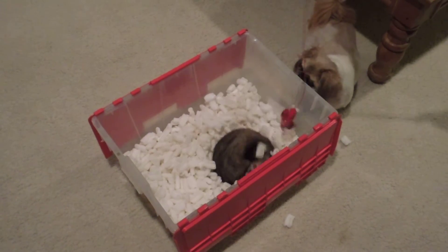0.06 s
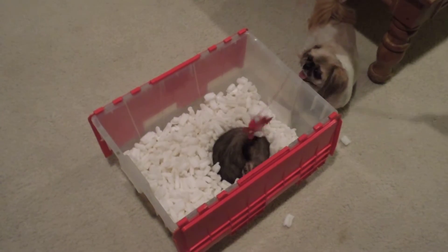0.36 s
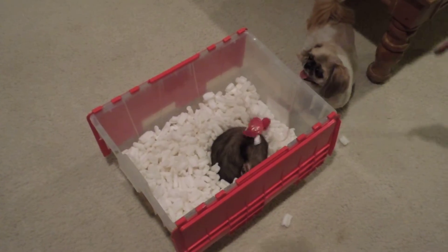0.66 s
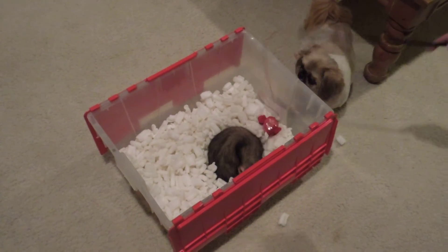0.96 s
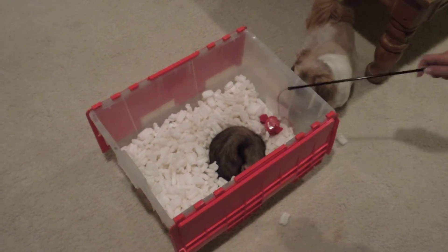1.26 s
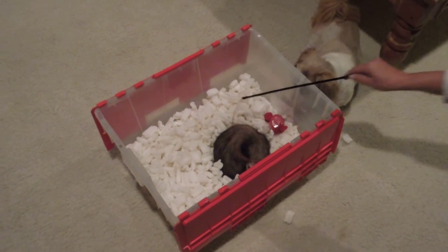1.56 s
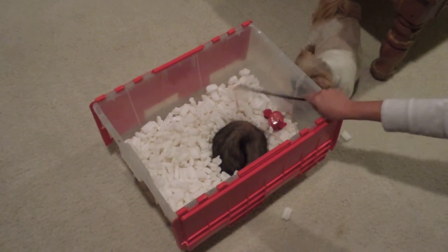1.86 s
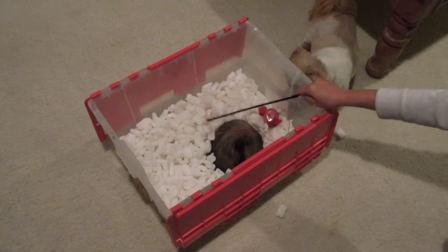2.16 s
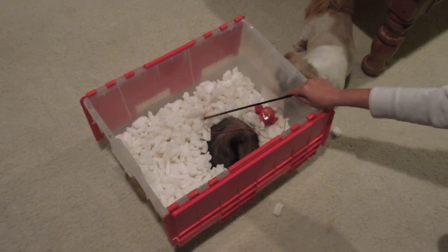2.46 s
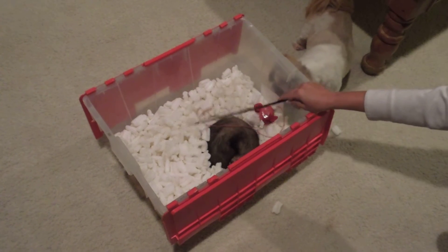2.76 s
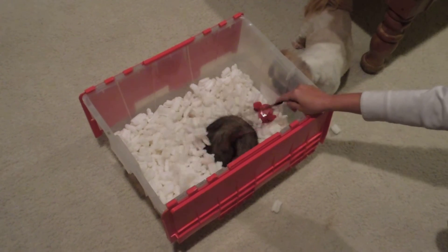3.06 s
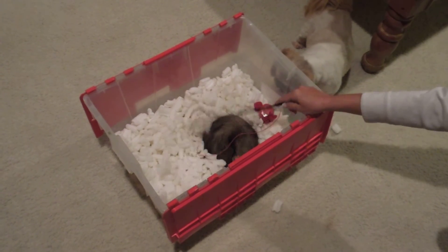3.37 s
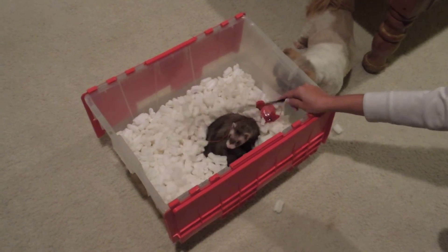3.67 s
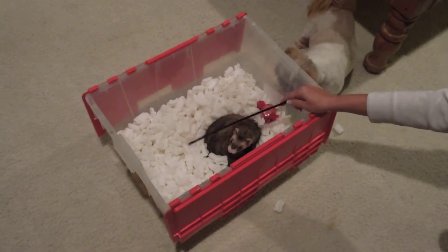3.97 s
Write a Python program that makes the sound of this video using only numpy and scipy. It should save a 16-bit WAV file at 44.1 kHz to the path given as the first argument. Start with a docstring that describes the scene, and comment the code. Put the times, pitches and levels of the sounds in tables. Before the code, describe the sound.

Scratchy rustling of packing foam, churned by a ferret and a stick in a bin.

```python
"""Foam packing pieces settle with a soft crackle as a ferret and a stick stir them in a plastic bin.
The foam rustles twice, then is churned about ten times a second. Every shove is a swarm of tiny slips:
a bright crackle on top, a hollow rumble from the bin below. Single pieces snap, stick and paws knock,
and friction adds light scrapes and one thin squeal. Behind it all is a quiet carpeted room, humming faintly."""
import sys
import numpy as np
from scipy import signal
from scipy.fft import rfft, irfft
from scipy.io import wavfile

SR = 44100
rng = np.random.default_rng(int(sys.argv[2]) if len(sys.argv) > 2 else 0)


def transcribe(u):
    """Save the signal u as a 16-bit wav file named by the first command-line argument.

    u: samples, shape (n,) or (channels, n), limited to [-1, 1]; the rate is SR.
    q: integer samples, one column per channel.
    """
    v = np.clip(np.atleast_2d(u).T, -1, 1)
    q = np.round(v * 32767).astype(np.int16)
    wavfile.write(sys.argv[1], SR, q)


N = 176400
TOP_HZ = 14100
SNAP_S = 0.0012  # decay of snaps and ticks
GRIPS_PER_S = 500  # stick-slip rate of scrapes and squeal
CRACKLE, RUMBLE = 0, 1  # which level column drives a layer


def stirred_bin(crackle_gain, rumble_gain, room_db=-8.5, room_t60_s=0.4):
    """Everything that sounds in the bin, with the room's short tail."""
    close = crackle(crackle_gain) + rumble(rumble_gain) + knocks() + scrapes() + squeal()
    room = burst(room_t60_s / np.log(1000), size=22050)
    return close + undb(room_db) * convolve(close, room)


def shoving(layer, release_s, attack_s=0.0041):
    """Envelope of the shoves: each rises, holds and dies away, and overlaps add in power."""
    # shoves through the foam: start_s, hold_s, crackle_db, rumble_db
    shoves = [ (0.731, 0.016, -35, -62), (.806, 0.04, -35.5, -51), (1.019, 0.025, -45, -60),
              (1.264, 0.004, -45.5, -50), (1.928, 0.006, -28.5, -44), (1.967, 0.076, -27.5, -37.5),
              (2.093, 0.02, -34, -57), (2.127, 0.0091, -27.5, -35.5), (2.16, 0.01, -35.5, -44),
              (2.2, 0.016, -29.5, -37), (2.237, 0.01, -29, -36.5), (2.315, 0.019, -32.5, -42.5),
              (2.379, 0.0099, -33.5, -41), (2.469, 0.013, -32, -49), (2.527, 0.032, -33, -42),
              (2.632, 0.086, -39, -49), (2.775, 0.0056, -34, -55), (2.876, 0.024, -33, -45.5),
              (2.921, 0.016, -37.5, -59), (2.984, 0.037, -34, -41), (3.08, 0.01, -24, -34.5),
              (3.188, 0.022, -28.5, -37.5), (3.279, 0.014, -28, -36.5), (3.4, 0.012, -28.5, -36.5),
              (3.474, 0.041, -30.5, -58), (3.575, 0.05, -28.5, -43), (3.667, 0.021, -32, -41.5),
              (3.693, 0.019, -28.5, -38), (3.778, 0.022, -30.5, -39), (3.846, 0.012, -35, -41)]
    t, power = np.arange(N) / SR, 0
    for start, hold, *db in shoves:
        rise = np.maximum(start - t, 0) / attack_s
        fall = np.maximum(t - start - hold, 0) / release_s
        power = power + (undb(db[layer]) * np.exp(-rise - fall)) ** 2
    return np.sqrt(power)


def shifting(layer):
    """Envelope of the foam that keeps shifting round the animal."""
    # level curve: time_s, crackle_db, rumble_db
    curve = [(0, -35, -37), (.06, -37, -41), (.31, -43, -50), (.45, -53, -60.5), (.6, -63.5, -62),
             (0.881, -52.5, -55.5), (.96, -52, -60), (1.14, -55, -53.5), (1.3, -50.5, -54),
             (1.5, -67, -57.5), (1.84, -58, -61.5), (1.96, -47, -43.5), (2.3, -45, -47.5),
             (2.85, -47.5, -53.5), (3.15, -38, -43.5), (3.4, -51.5, -48), (3.62, -44, -39.5),
             (3.85, -42.5, -68), (4, -48.5, -53)]
    times, *levels = np.array(curve).T
    return undb(np.interp(np.arange(N) / SR, times, levels[layer]))


def crackle(shove_gain, wall_s=0.0042, wall_db=-4.5):
    """Bright shoves on top, duller shifting deep in the heap, single snaps; the bin's walls smear them."""
    # duller tone of buried foam: freq_hz, gain_db
    buried_eq = [(2500, 7), (11000, -2.5)]
    # single pieces snapping: start_s, level_db
    snaps = [(0.709, -36.5), (0.716, -35), (0.879, -38), (1.2546, -31.5), (1.886, -38), (1.911, -38),
             (1.922, -26), (1.9339, -22), (1.998, -22), (2.046, -18.5), (2.3855, -28.5), (2.63, -31),
             (2.997, -25), (3.2816, -24), (3.386, -32), (3.5545, -30), (3.7805, -27)]
    # bright tone of the whole crackle: freq_hz, relative_db
    crackle_eq = [(200, -44.5), (700, -17.5), (1500, -12.5), (3800, -7.5), (5600, -7.5), (8000, -4.5),
                  (10500, -0.5), (12200, 1.5), (14000, -2)]
    foam = rubbing() * shove_gain + shade(rubbing() * shifting(CRACKLE), buried_eq)
    for start, db in snaps:
        snap = burst(SNAP_S) * undb(db) * np.sqrt(2 * SNAP_S * SR)
        i = int(start * SR)
        foam[i:i + len(snap)] += snap[:N - i]
    return colour(foam + undb(wall_db) * scatter(foam, wall_s), crackle_eq)


def rubbing(squeak_db=-6, tick_db=-5.5):
    """Foam slipping against foam: a swarm of tiny clicks and squeaks, with sparser crisp ticks."""
    slips = unit(scatter(clicks(per_s=3200), decay_s=0.0003))
    ticks = unit(scatter(clicks(per_s=130, spread_db=2.8), SNAP_S))
    return unit(slips + undb(squeak_db) * squeaks() + undb(tick_db) * ticks)


def squeaks(pieces=300, low_hz=900, decay_s=0.0025):
    """Pieces of different sizes each ring briefly at their own pitch when rubbed."""
    t = np.arange(1024) / SR
    hits = clicks(per_s=900)
    piece = rng.integers(pieces, size=N)
    pitch_hz = rng.uniform(low_hz, TOP_HZ, (pieces, 1))
    rings = np.sin(2 * np.pi * pitch_hz * t) * np.exp(-t / decay_s)
    out = np.zeros(N + len(t))
    for i in np.flatnonzero(hits):
        out[i:i + len(t)] += hits[i] * rings[piece[i]]
    return unit(out[:N])


def rumble(gain):
    """Pieces bump the bin, which answers with hollow resonances."""
    # dull tone of the bumps: freq_hz, relative_db
    bump_eq = [(60, -55.5), (130, -13), (220, -6.5), (480, -1.5), (700, -9), (1000, -8), (1600, -9),
               (2300, -21)]
    # resonances of the bin, with gain relative to the bumps: pitch_hz, width_hz, gain_db
    bin_modes = [(219.5, 18, 1.5), (300.5, 22, 1.5), (350.5, 10.7, 4), (832, 25, 1)]
    bumps = unit(scatter(clicks(per_s=600), decay_s=0.0026))
    drive = colour(bumps * gain, bump_eq)
    rings = sum(undb(db) * resonate(drive, hz, width) for hz, width, db in bin_modes)
    return undb(-3.0) * (drive + rings)


def knocks(rattle_s=0.0065, ring_cycles=5, ring_top_hz=550, size=4096):
    """Where the blow lands sets the plastic's pitch: low knocks ring briefly, high ones mostly rattle."""
    # stick and paws on the bin: start_s, level_db, pitch_hz
    blows = [(0.03, -49.5, 349), (0.067, -44.5, 309), (1.135, -55, 544), (1.254, -50, 1290),
             (1.933, -35, 1650), (1.934, -39, 844), (1.938, -35.5, 500), (1.999, -38.5, 1370),
             (2.017, -38, 886), (2.541, -41.5, 492), (2.784, -46.5, 1400), (2.986, -37.5, 1240),
             (3.189, -41.5, 313), (3.554, -38, 1600), (3.687, -46.5, 455)]
    out, t = np.zeros(N + size), np.arange(size) / SR
    for start, db, hz in blows:
        ring = np.sin(2 * np.pi * hz * t) * np.exp(-t * hz / ring_cycles)
        envelope = np.exp(-t / rattle_s) * (1 - np.exp(-t * hz))
        rattle = band(rng.standard_normal(size), hz, octaves=0.41) * envelope
        knock = min(1, ring_top_hz / hz) * unit(ring) + unit(rattle)
        i = int(start * SR)
        out[i:i + size] += undb(db) * knock / np.linalg.norm(knock) * np.sqrt(2 * rattle_s * SR)
    return out[:N]


def scrapes():
    """Stick-slip clicks through one resonance, swelling and fading; slow rubs ring more narrowly."""
    # light scrapes of the crinkly toy on the wand as it lands, then the string sliding on the rim: peak_s,
    # half_length_s, level_db, centre_hz, width_octaves
    strokes = [(0.747, 0.013, -51, 3500, .35), (0.825, 0.021, -52, 3700, 0.4),
               (0.85, 0.06, -54.5, 1600, .26), (1.033, 0.014, -52, 3300, 0.88),
               (1.38, 0.23, -61.5, 1920, 0.25)]
    grip = clicks(GRIPS_PER_S)
    return sum(undb(db) * swell(peak, half) * unit(band(grip, hz, octaves))
               for peak, half, db, hz, octaves in strokes)


def squeal(pitches_hz=(4500, 6950, 10600)):
    """A faint thin squeal leads into the first rustle: friction through narrow high resonances."""
    # its swell: peak_s, half_length_s, level_db
    shape = (0.7, 0.056, -57.5)
    peak, half, db = shape
    grip = clicks(GRIPS_PER_S)
    rings = sum(resonate(grip, hz, width_hz=400) for hz in pitches_hz)
    return undb(db) * swell(peak, half) * unit(rings)


def room_tone(level_db=-53):
    """A bed of soft, dark noise."""
    # bass-heavy tilt of the room: freq_hz, relative_db
    room_eq = [(25, -1), (230, -6.5), (800, -13.5), (2600, -20.5), (14000, -26)]
    return undb(level_db) * unit(colour(rng.standard_normal(N), room_eq))


def mains_hum(pitch_hz=59.7, level_db=-64.5):
    """The mains hums on one low sine."""
    return undb(level_db) * np.sqrt(2) * np.sin(2 * np.pi * pitch_hz * np.arange(N) / SR)


def clicks(per_s, spread_db=4.0):
    """Randomly timed clicks of uneven size."""
    return (rng.random(N) < per_s / SR) * undb(spread_db * np.clip(rng.standard_normal(N), -2, 2))


def scatter(x, decay_s):
    """Give every click its own fresh, dying burst of noise with the same energy."""
    keep = np.exp(-2 / (decay_s * SR))
    power = signal.lfilter([1 - keep], [1, -keep], x ** 2 + 1e-18)
    return rng.standard_normal(N) * np.sqrt(power)


def burst(decay_s, size=2048):
    """A dying burst of noise with unit energy."""
    x = rng.standard_normal(size) * np.exp(-np.arange(size) / SR / decay_s)
    return x / np.linalg.norm(x)


def swell(peak_s, half_length_s):
    """A bell-shaped fade in and out."""
    return np.exp(-((np.arange(N) / SR - peak_s) / half_length_s) ** 2 / 2)


def resonate(x, hz, width_hz):
    """Ring one narrow resonance."""
    return signal.lfilter(*signal.iirpeak(hz, hz / width_hz, fs=SR), x)


def band(x, hz, octaves):
    """Keep a bell-shaped band round a centre."""
    f = np.linspace(1, SR / 2, len(x) // 2 + 1)
    return irfft(rfft(x) / (1 + (np.log2(f / hz) / octaves) ** 2) ** 2, len(x))


def colour(x, eq, size=2048):
    """Minimum-phase EQ that keeps the power of white noise."""
    cepstrum = irfft(np.log(gains(eq, size + 1)))
    cepstrum[1:size] *= 2
    cepstrum[size + 1:] = 0
    response = irfft(np.exp(rfft(cepstrum)))
    return convolve(x, response / np.linalg.norm(response))


def shade(x, eq):
    """Zero-phase EQ that boosts and cuts by the given gains."""
    return irfft(rfft(x) * gains(eq, N // 2 + 1), N)


def gains(eq, size):
    """Gain at evenly spaced frequencies from (Hz, dB) points."""
    hz, db = np.array(eq).T
    return undb(np.interp(np.log(np.linspace(1, SR / 2, size)), np.log(hz), db))


def convolve(x, response):
    """Pass a sound through a response."""
    return signal.fftconvolve(x, response)[:N]


def unit(x):
    """Scale to an rms of one."""
    return x / np.sqrt(np.mean(x ** 2))


def undb(db):
    """Decibels to gain."""
    return 10 ** (np.asarray(db) / 20)


def scene():
    """The bin and the hum straight ahead, the bin wide only in the treble; diffuse room tone around."""
    # stereo width of the bin: freq_hz, side_db
    bin_width = [(4500, -70), (8000, -11.5), (11000, -7)]
    # stereo width of the room tone: freq_hz, side_db
    room_width = [(90, -8), (260, -2)]
    crackle_gain = shoving(CRACKLE, release_s=0.016)
    rumble_gain = np.hypot(shoving(RUMBLE, release_s=0.024), shifting(RUMBLE))
    mid = stirred_bin(crackle_gain, rumble_gain) + room_tone() + mains_hum()
    side = shade(stirred_bin(crackle_gain, rumble_gain), bin_width) + shade(room_tone(), room_width)
    return np.array([mid + side, mid - side])


def record(dry):
    """A steep low-pass cuts the very top."""
    return signal.sosfilt(signal.ellip(12, .1, 80, TOP_HZ, fs=SR, output="sos"), dry)


dry = scene()
out = record(dry)
transcribe(out)
```